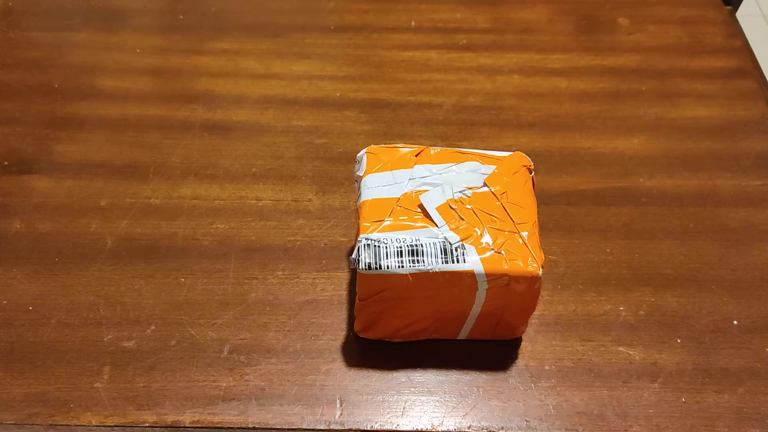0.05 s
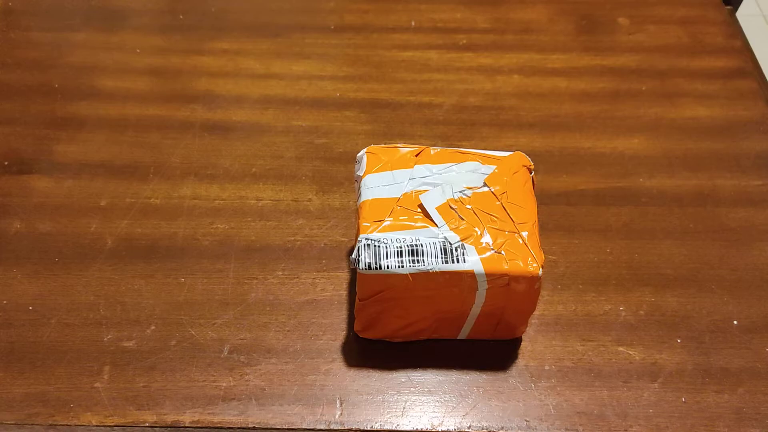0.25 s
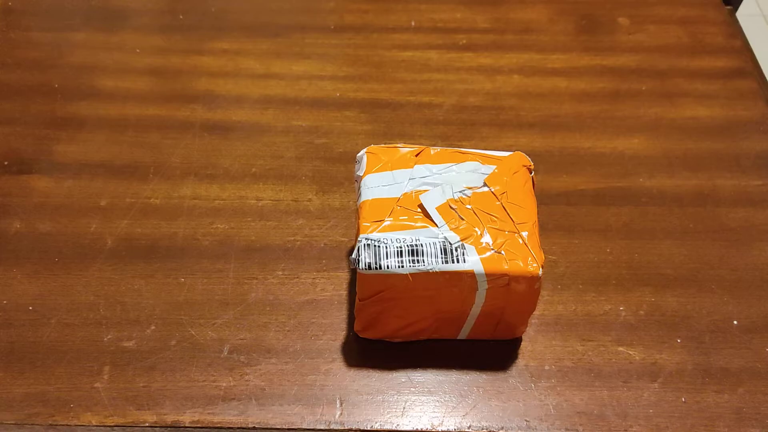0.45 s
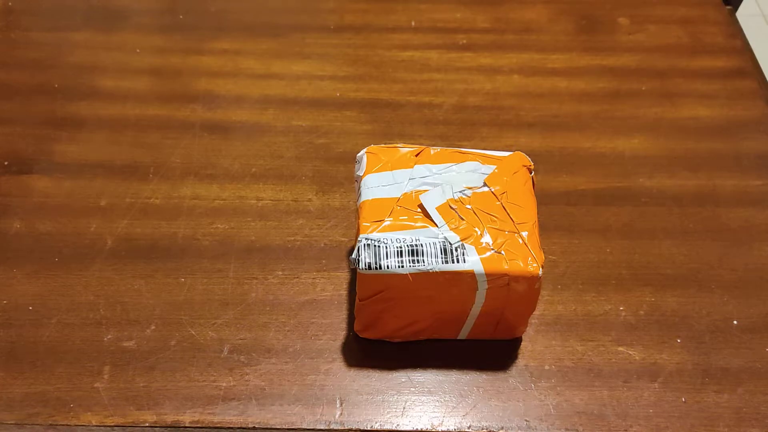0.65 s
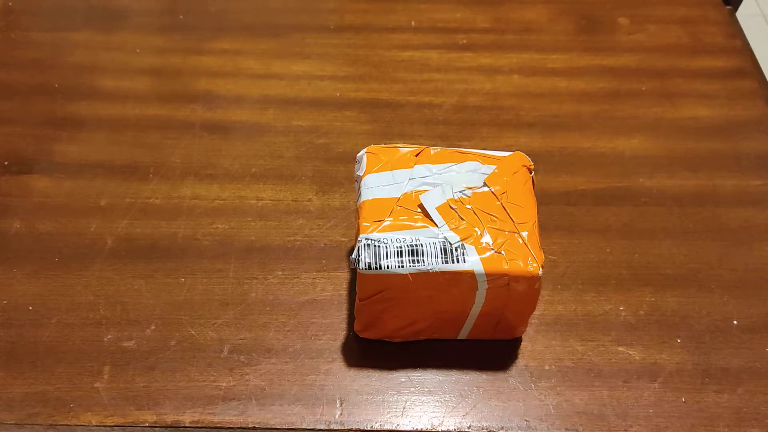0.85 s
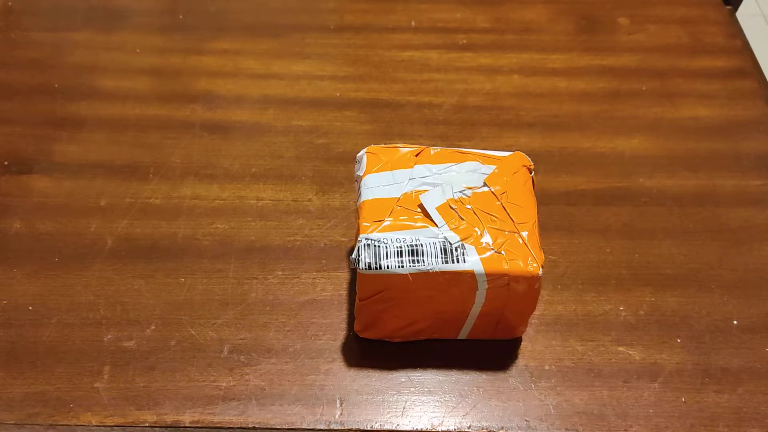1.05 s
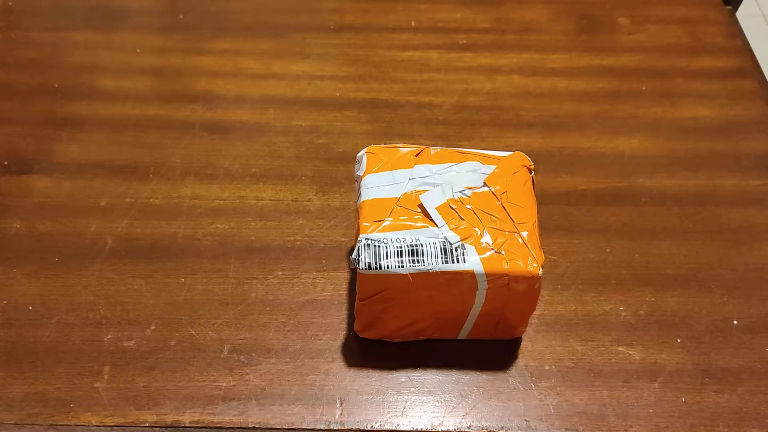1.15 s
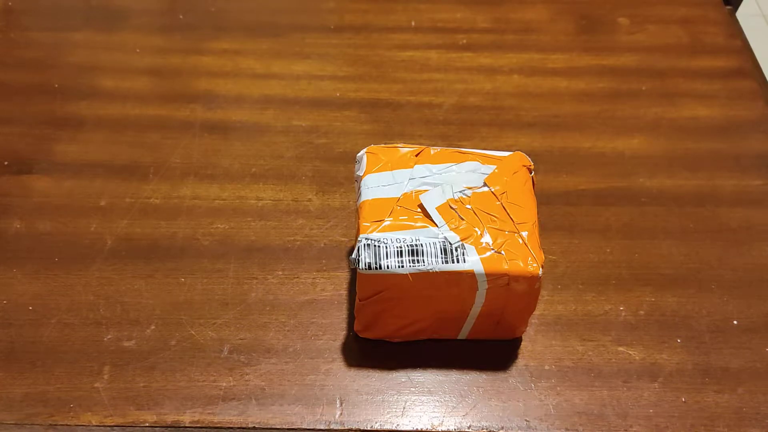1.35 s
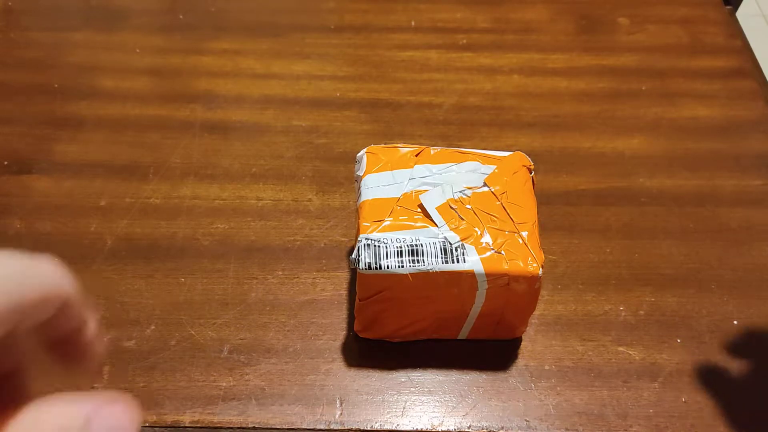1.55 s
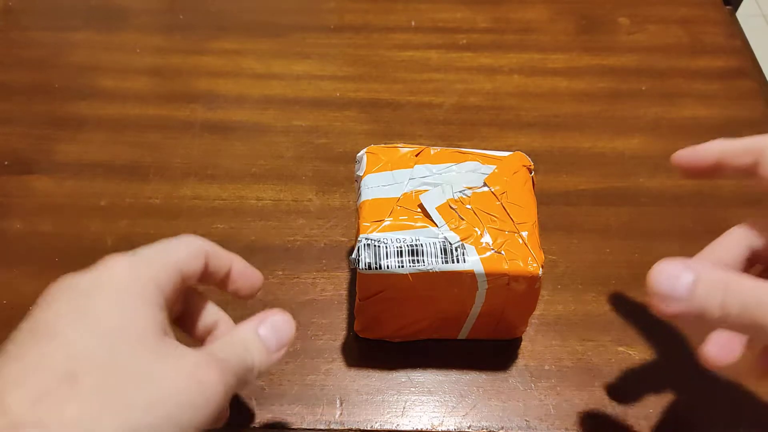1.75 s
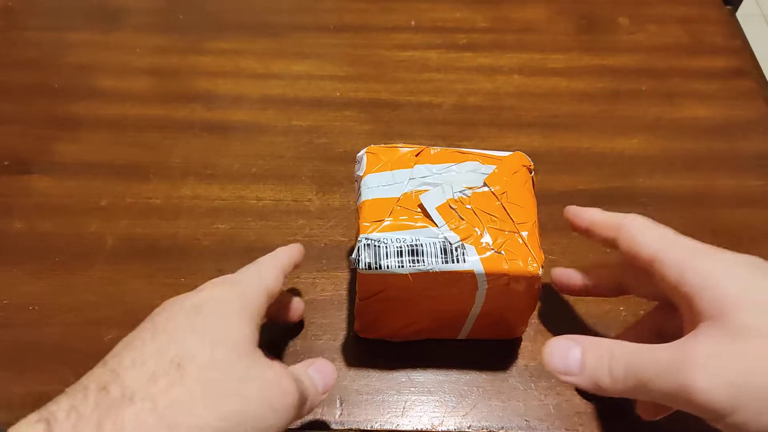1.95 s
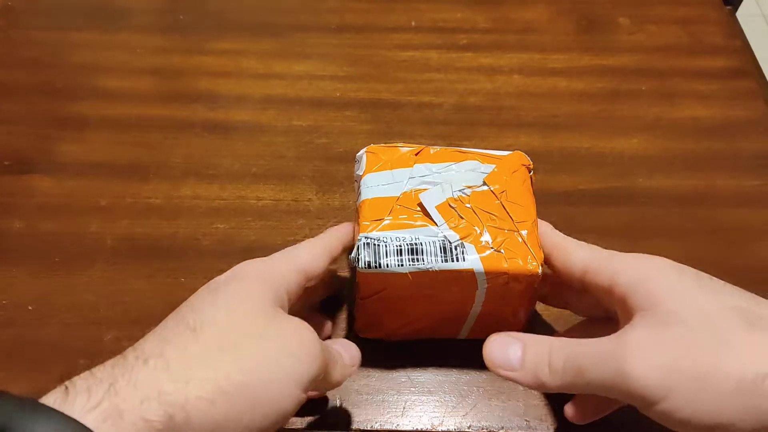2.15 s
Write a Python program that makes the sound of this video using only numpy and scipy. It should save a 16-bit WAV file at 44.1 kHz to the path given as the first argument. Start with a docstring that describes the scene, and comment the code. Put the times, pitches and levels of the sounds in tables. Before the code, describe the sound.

Quiet room hum and hiss, then fingers lightly tapping a plastic-wrapped parcel.

```python
"""A quiet room, on a stereo microphone: mains hum beats against a small motor and a fan, over soft
air noise, thin whines and microphone hiss. The input opens with a soft pop, a subsonic surge and
two dry electrical clicks as its offset jumps. Near the microphone a sleeve swishes, the arms reach
forward, and at the end fingers touch a plastic-wrapped parcel on a wooden table."""
import sys
import numpy as np
from scipy import signal
from scipy.fft import rfft, irfft
from scipy.io import wavfile

SR = 44100
rng = np.random.default_rng(int(sys.argv[2]) if len(sys.argv) > 2 else 0)


def master_out(mix):
    """Clip the mix to full scale and print it as 16-bit PCM to the path in sys.argv[1]."""
    frames = np.transpose(np.atleast_2d(mix))
    ceiling = np.clip(frames, -1, 1)
    pcm = np.round(ceiling * 32767).astype(np.int16)
    wavfile.write(sys.argv[1], SR, pcm)


N = 97020
TIME = np.arange(N) / SR
MAINS_HZ, MOTOR_HZ, FAN_HZ = 50.12, 49.165, 47.2

# gain of the hum, and of the other room tone, as the input opens: time_s, gain_db
HUM_FADE = [(0, -66), (.05, -51), (0.072, -18), (.195, -11.5), (.3, -2.5), (.65, -0.5), (1.05, 0),
            (1.45, -3), (1.7, -1.5), (2.2, -6.5)]
ROOM_FADE = [(0, -82), (.052, -62), (.06, -19.5), (.085, -12.5), (.2, -6.5), (.28, -3), (.5, -1.26),
             (.95, 0), (1.15, -1), (1.35, -2.5), (1.5, -3.5), (1.75, -3.5), (2.2, -2.5)]
# hum partials, before the fade: harmonic, level_db, left_minus_right_db
MAINS_PARTIALS = [(2, -50.5, 5.5), (4, -52, 0.5), (6, -69.5, 3)]
MOTOR_PARTIALS = [(2, -66.5, -3), (4, -58, 1.5), (6, -76, 0), (7, -72, -6), (10, -75, 11)]
FAN_PARTIALS = [(1, -80, 1), (2, -66.5, 1.3), (4, -61.5, 1.7)]
# thin whines in the room, before the fade: pitch_hz, level_db
WHINE_TONES = [(661, -69.5), (850, -75.5), (1218, -80), (2090, -78), (2251, -83), (3851, -84),
               (5314, -84.5)]
# colour of each noise at the microphone: frequency_hz, relative_db
AIR_SPECTRUM = [(30, 1.5), (60, 0.5), (130, -5.5), (240, 0.5), (340, -7.5), (700, -9), (1000, -12.5),
                (1500, -17.5), (2250, -16.5), (2750, -24.5), (4800, -25.5), (5600, -38.5), (9000, -33.5),
                (16000, -50)]
HISS_SPECTRUM = [(500, -2.5), (5000, -0.5), (9000, -5.5), (13000, 3), (16000, 1.5)]
SLEEVE_SPECTRUM = [(1000, -2), (2400, -8), (3500, 4), (5500, -4), (8000, -3), (10000, -5), (16000, -12)]
REACH_SPECTRUM = [(200, 2), (450, 0), (1000, 1.5), (1600, -4), (4000, -13), (6000, -30), (16000, -37)]
WRAP_SPECTRUM = [(600, -6), (2000, -2), (4500, 3), (8500, -4), (11000, -3), (16000, -5)]
# how alike left and right hear any noise: frequency_hz, correlation
STEREO_LIKENESS = [(60, 0.18), (130, 0.65), (290, 0.79), (640, .35), (1400, 0), (16000, 0)]
# bright sleeve swishes and the dull rustle of reaching arms: peak_s, level_db, attack_s, release_s
SLEEVE_STROKES = [(.85, -65, 0.41, 0.17), (1.235, -61.5, 0.054, 0.037), (1.266, -56.5, 0.02, .013)]
REACH_STROKES = [(1.87, -57.5, 0.076, 0.16)]
# fingertips landing on the parcel: start_s, level_db, pitch_hz
FINGER_TAPS = [(2.0136, -45, 1440), (2.1685, -50, 1060)]
# two faint stray ticks, then the plastic wrap: start_s, level_db, ring_hz, ring_relative_db, t60_s
WRAP_SNAPS = [(.5985, -62.5, 8040, 6, 0.021), (.6075, -62, 7800, 8, 0.016),
              (2.123, -48.5, 13800, -18, 0.0062), (2.1627, -58, 3020, 4, .018),
              (2.1693, -51, 8200, 5.5, 0.0054), (2.171, -52, 4300, 6.5, 0.016),
              (2.1776, -48, 6540, -27, 0.02), (2.186, -52, 7000, -1, 0.026), (2.1932, -49, 13300, 1, .016),
              (2.199, -57, 10900, 7, .015)]
# input offset ahead of the coupling, left row then right: start_s, height, rise_s
OFFSET_SURGES = [(.208, 1.95, 0.15), (.205, 1.14, 0.066)]
# sudden falls of that offset, heard as clicks: start_s, left_drop, right_drop
OFFSET_DROPS = [(0.2361, .048, 0.069), (0.296, 0.043, 0.036)]


def from_db(db):
    """Decibels to gain."""
    return 10 ** (np.asarray(db) / 20)


def unit_rms(x):
    """Scale to an rms of 1."""
    return x / np.sqrt(np.mean(x ** 2) + 1e-20)


def pan(db):
    """Channel gains for a left-minus-right level."""
    return from_db(np.array([[db], [-db]]) / 2)


def at_hz(points, hz):
    """Read a table on a log-frequency axis."""
    frequencies, values = np.transpose(points)
    return np.interp(np.log(hz + 1), np.log(frequencies), values)


def drift(rate_hz):
    """Random wander of spread about 1, mostly slower than rate_hz."""
    hz = np.fft.rfftfreq(N // 10, 20 / SR)
    slow = unit_rms(irfft(rfft(rng.standard_normal(N // 10)) / (1 + (hz / rate_hz) ** 2)))
    return np.interp(np.arange(N) / 20, np.arange(len(slow)), slow)


def noise(spectrum):
    """Coloured stereo noise, a touch to the left: alike in the low mids, diffuse in the treble."""
    hz = np.fft.rfftfreq(N, 1 / SR)
    mid, side = rfft(rng.standard_normal((2, N))) * from_db(at_hz(spectrum, hz)) * (hz < 15900)
    alike = at_hz(STEREO_LIKENESS, hz)
    channels = np.sqrt(1 + alike) * mid + np.sqrt(1 - alike) * side * [[1], [-1]]
    return unit_rms(irfft(channels, N)) * pan(0.6)


def decay(start_s, t60_s):
    """Instant attack, then a fall of 60 dB every t60_s."""
    return (TIME >= start_s) * from_db(-60 * np.maximum(TIME - start_s, 0) / t60_s)


def whines(waver_db=5.5, waver_rad=1):
    """Faint tones come and go, differently on each side of the microphone."""
    out = np.zeros((2, N))
    for channel in out:
        for hz, db in WHINE_TONES:
            amplitude = np.sqrt(2) * from_db(db + waver_db * drift(2.7))
            phase = 2 * np.pi * (hz * TIME + rng.random()) + waver_rad * drift(2.7)
            channel += amplitude * np.sin(phase)
    return out


def hum(base_hz, partials, waver_db=1.62, waver_rad=0.11):
    """Mains, motor or fan hums at multiples of its own rate, wavering a little."""
    out = 0
    phase = 2 * np.pi * base_hz * TIME + waver_rad * drift(0.92)
    for harmonic, db, pan_db in partials:
        amplitude = np.sqrt(2) * from_db(db + waver_db * drift(2))
        out += amplitude * np.sin(harmonic * phase) * pan(pan_db)
    return out


def room_tone():
    """Three beating hums, whines, air and microphone hiss fade in as the input opens."""
    hum_gain = from_db(np.interp(TIME, *np.transpose(HUM_FADE)))
    room_gain = from_db(np.interp(TIME, *np.transpose(ROOM_FADE)))
    hums = hum(MAINS_HZ, MAINS_PARTIALS) + hum(MOTOR_HZ, MOTOR_PARTIALS) + hum(FAN_HZ, FAN_PARTIALS)
    air = from_db(-50.5) * noise(AIR_SPECTRUM)
    pressure_wander = from_db(-43) * drift(2.7)
    tones = whines()
    hiss = from_db(-61.5) * noise(HISS_SPECTRUM)
    return hum_gain * hums + room_gain * (tones + air + pressure_wander + hiss)


def cloth(strokes, spectrum, grain_db):
    """Fabric slides: friction noise swells and fades with each stroke, roughened by grain_db."""
    envelope = 0
    for peak_s, db, attack_s, release_s in strokes:
        width_s = np.where(TIME < peak_s, attack_s, release_s)
        envelope += from_db(db) * np.exp(-((TIME - peak_s) / width_s) ** 2)
    return envelope * noise(spectrum) * from_db(grain_db * drift(150))


def finger_taps():
    """Each fingertip lands with a short dull tick about an octave wide."""
    out = 0
    for start_s, db, hz in FINGER_TAPS:
        band = [(hz / 3, -14), (hz * 0.91, 0), (hz * 1.3, -3), (hz * 3, -30)]
        out += from_db(db) * decay(start_s, t60_s=0.016) * noise(band)
    return out


def plastic_wrap(ring_width=0.3):
    """The wrap snaps under the fingers: each snap is a bright burst with a ringing band of noise."""
    out = 0
    crackle = noise(WRAP_SPECTRUM)
    shoulder, skirt = 1 + ring_width / 2, 1 + 2 * ring_width  # frequency ratios
    for start_s, db, hz, ring_db, t60_s in WRAP_SNAPS:
        band = [(hz / skirt, -40), (hz / shoulder, -4), (hz, 0), (hz * shoulder, -4), (hz * skirt, -40)]
        ring = from_db(ring_db) * noise(band)
        out += from_db(db) * decay(start_s, t60_s) * (crackle + ring)
    return out


def opening_pop(peak_s=0.0595, height=0.0091, width_s=0.0023):
    """The right channel opens with one small rounded pulse."""
    return np.array([[0], [-height]]) * np.exp(-((TIME - peak_s) / width_s) ** 2)


def input_settling(coupling_hz=1.724):
    """The microphone input's offset surges and drops twice; the coupling high-pass drains it away."""
    surge = np.array([height * (1 - np.exp(-np.maximum(TIME - start_s, 0) / rise_s))
                      for start_s, height, rise_s in OFFSET_SURGES])
    drops = sum(np.array([[left], [right]]) * (TIME >= start_s) for start_s, left, right in OFFSET_DROPS)
    coupling = signal.butter(2, coupling_hz, "high", fs=SR, output="sos")
    return signal.sosfilt(coupling, surge - drops)


def scene():
    """Room tone behind, sleeves and parcel in front, and the microphone's own input settling."""
    sleeve = cloth(SLEEVE_STROKES, SLEEVE_SPECTRUM, grain_db=0)
    reach = cloth(REACH_STROKES, REACH_SPECTRUM, grain_db=-2)
    return room_tone() + sleeve + reach + plastic_wrap() + finger_taps() + opening_pop() + input_settling()


def record(dry, cutoff_hz=15900):
    """The recorder cuts the top steeply, with no phase shift."""
    low_pass = signal.ellip(10, 0.05, 50, cutoff_hz, fs=SR, output="sos")
    return signal.sosfiltfilt(low_pass, dry)


dry = scene()
out = record(dry)
master_out(out)
```